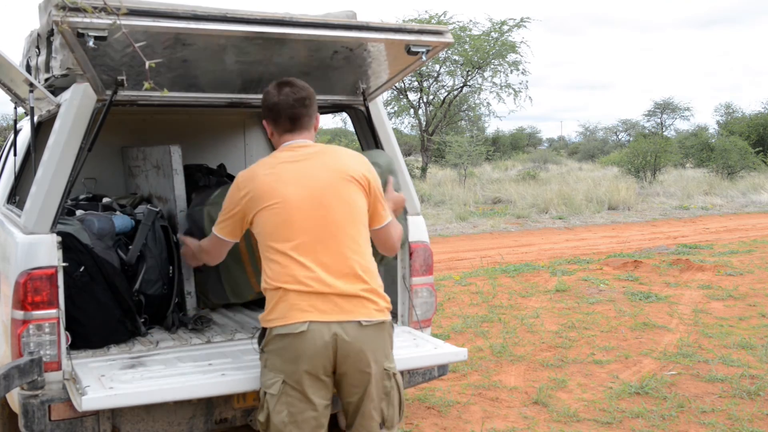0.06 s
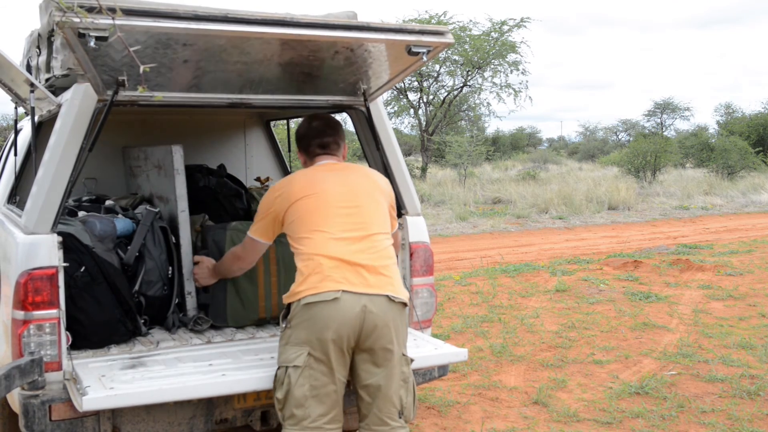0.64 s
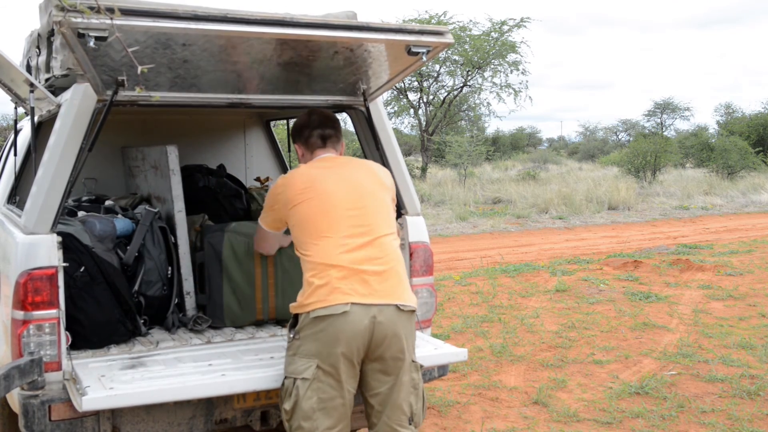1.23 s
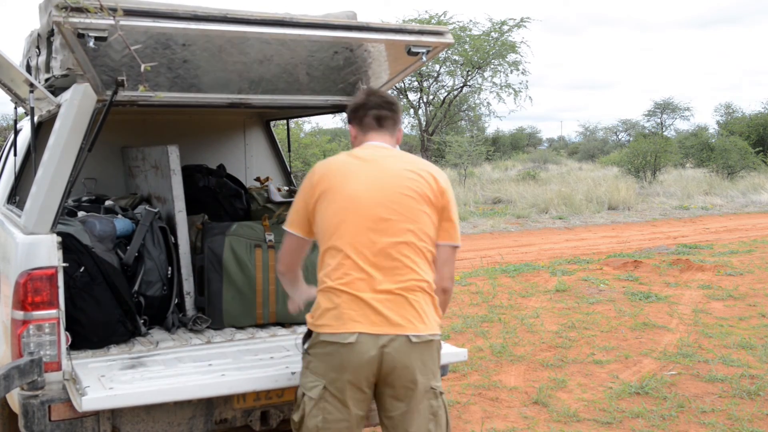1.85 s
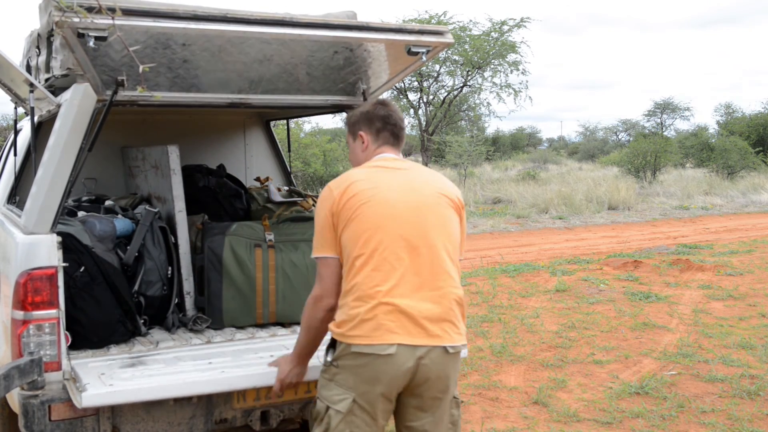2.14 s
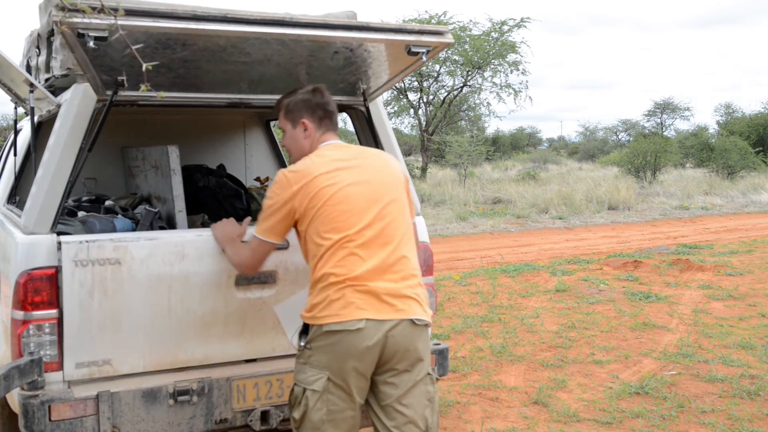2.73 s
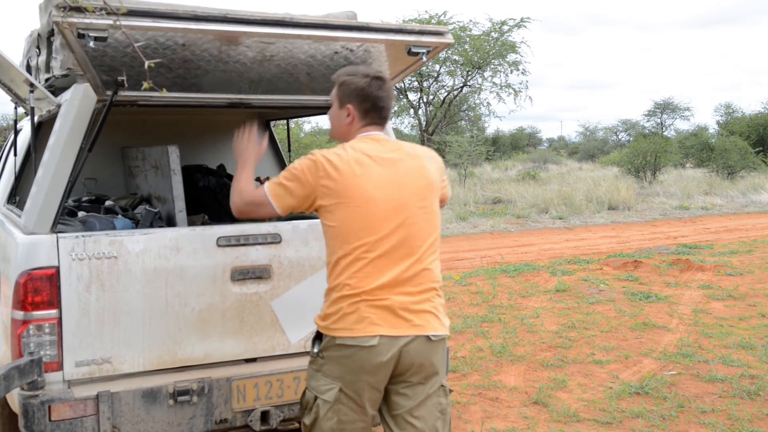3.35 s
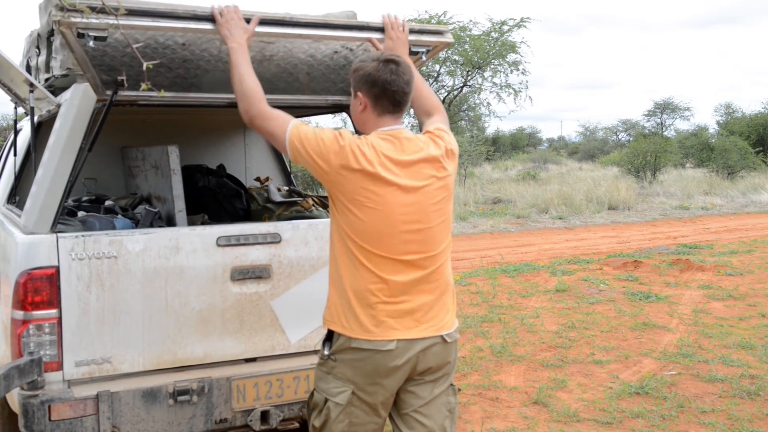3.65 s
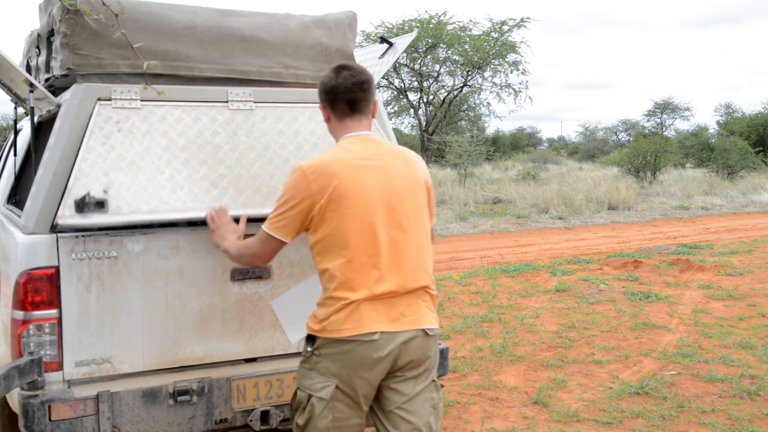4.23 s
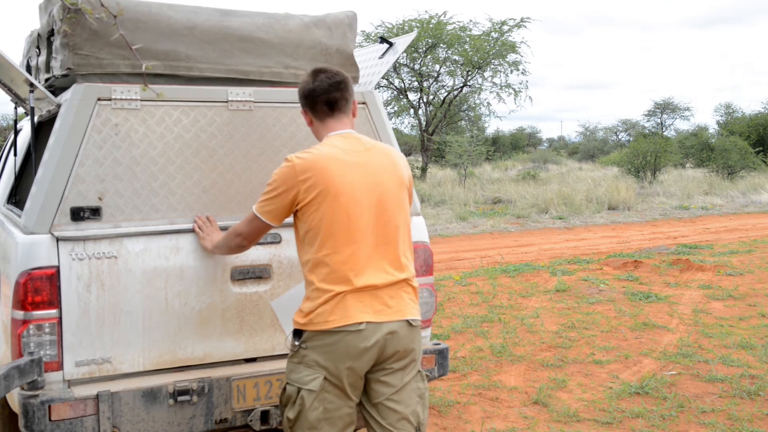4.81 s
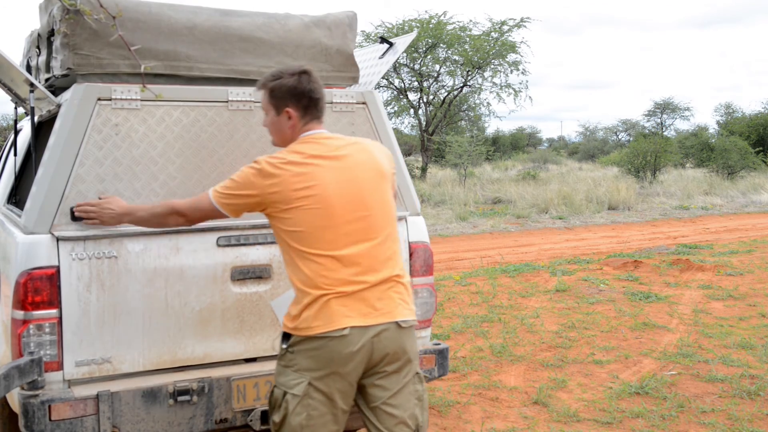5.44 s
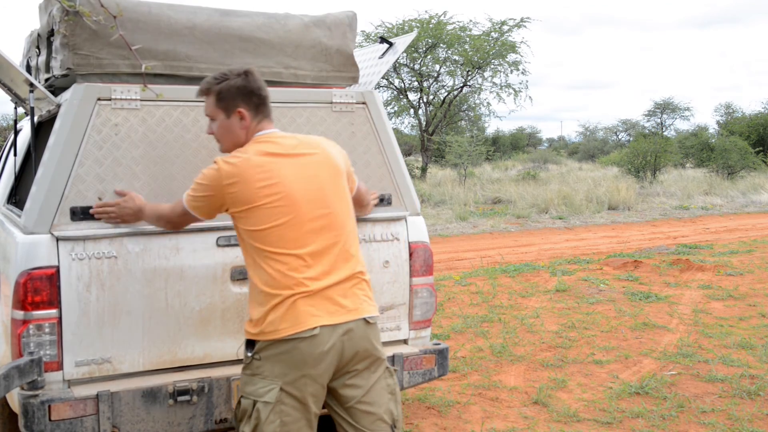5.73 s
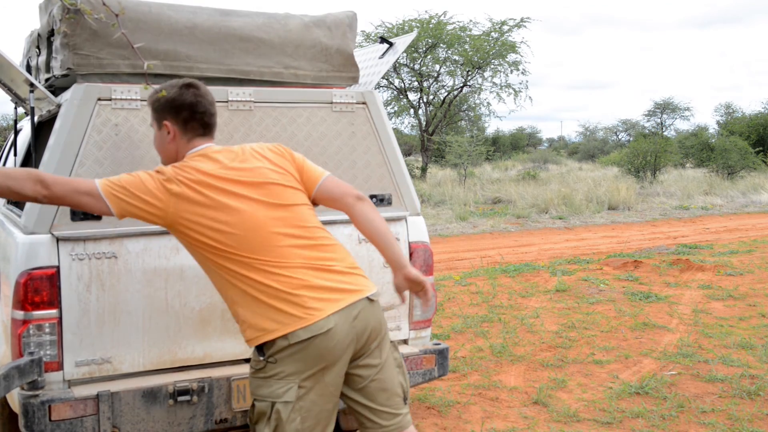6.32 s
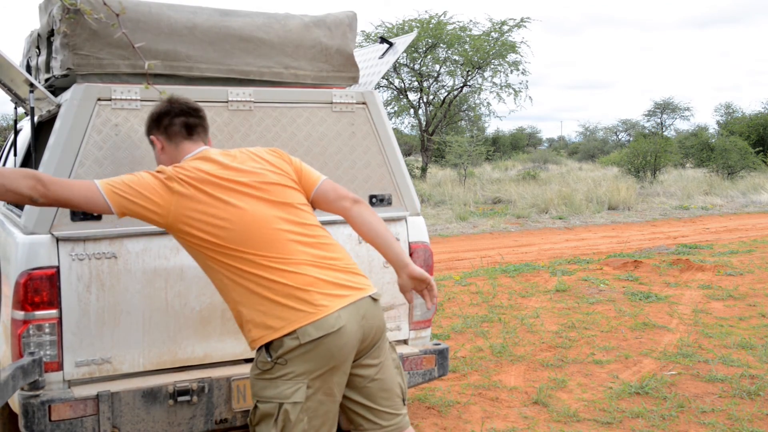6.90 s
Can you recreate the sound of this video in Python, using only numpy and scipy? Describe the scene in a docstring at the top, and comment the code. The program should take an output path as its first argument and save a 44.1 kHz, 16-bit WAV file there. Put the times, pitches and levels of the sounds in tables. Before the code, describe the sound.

Luggage is shoved into a truck outdoors, followed by a slammed steel tailgate and a hatch banged shut and pressed into its latches.

```python
"""Loading and closing a pickup

A canvas bag is shoved over the ribbed bed, thumping and scraping, its buckles tinkling. The steel
tailgate is lifted and slammed; the canopy hatch drops on hissing gas struts, bangs shut and is pressed
into its latches. Outdoors in still air: only the hollow truck rings on."""
import sys
import numpy as np
from scipy import signal
from scipy.fft import rfft, irfft, next_fast_len
from scipy.io import wavfile
from scipy.ndimage import uniform_filter1d

SR = 44100
rng = np.random.default_rng(int(sys.argv[2]) if len(sys.argv) > 2 else 0)


def unload_audio(sound):
    """Save the sound as a 16-bit wav file, at the path given as the first command line argument."""
    columns = np.transpose(np.atleast_2d(sound))
    # keep every value between -1 and 1, then stretch to whole-number steps
    steps = np.round(np.clip(columns, -1, 1) * 32767)
    wavfile.write(sys.argv[1], SR, steps.astype(np.int16))


N = 311654
T = np.arange(N) / SR
BANDS_HZ = 25 * 2 ** np.arange(0, 9.5, 1 / 3)
LN_1000 = np.log(1000)  # 60 dB of decay

# anchors of a contact spectrum: (body [Hz], clang [Hz], click [Hz], air [Hz])
CONTACT_HZ = (450, 1500, 5500, 12000)
# rumble of the hollow truck body: (frequency [Hz], level [dB])
RUMBLE_SPECTRUM = [(25, -9), (45, 2.5), (75, 1), (100, -4.5), (135, 2.5), (175, -9), (260, -24),
                   (600, -52.5)]


def undb(db):
    """Decibels to gain."""
    return 10 ** (np.asarray(db) / 20)


def unit(x):
    """Scale to rms 1."""
    return x / np.sqrt(np.mean(x ** 2))


def add(track, start_s, sound):
    """Mix a sound into a track."""
    i = max(int(start_s * SR), 0)
    track[i:i + len(sound)] += sound[:N - i]


def noise(spectrum):
    """Noise of rms 1 shaped by (frequency [Hz], level [dB]) points."""
    hz, db = np.transpose(spectrum)
    size = next_fast_len(N, True)
    bins_hz = np.fft.rfftfreq(size, 1 / SR) + 1
    gain = undb(np.interp(np.log(bins_hz), np.log(hz), db))
    return unit(irfft(rfft(rng.standard_normal(size)) * gain, size)[:N])


def waver(rate_hz):
    """Ramps between random levels, rms 1."""
    step = int(SR / rate_hz)
    held = np.repeat(rng.standard_normal(N // step + 1), step)
    return unit(uniform_filter1d(held, step)[:N])


def push(t, length_s, attack_s, release_s):
    """Envelope of an effort: attack, hold, release."""
    return (1 - np.exp(-np.maximum(t, 0) / attack_s)) * np.exp(-np.maximum(t - length_s, 0) / release_s)


def split(x):
    """Third-octave bands at equal rms."""
    size = next_fast_len(N)
    spectrum = rfft(x, size)
    octave = np.log2(np.fft.rfftfreq(size, 1 / SR) + 1)
    shares = (np.sqrt(np.maximum(1 - 3 * abs(octave - np.log2(hz)), 0)) for hz in BANDS_HZ)
    return np.array([unit(irfft(spectrum * share, size)[:N]) for share in shares]) / np.sqrt(5)


def contact_gains(levels_db, bass_cut_db=7):
    """Band gains from levels at CONTACT_HZ, sloped below the lowest anchor."""
    octaves_below = np.maximum(np.log2(CONTACT_HZ[0] / BANDS_HZ), 0)
    band_db = np.interp(np.log(BANDS_HZ), np.log(CONTACT_HZ), levels_db)
    return undb(band_db - bass_cut_db * octaves_below ** 0.91)


def bandpass(x, hz, width_hz):
    """One resonance, unity gain at its peak."""
    return signal.lfilter(*signal.iirpeak(hz, hz / width_hz, fs=SR), x)


def resonate(x, peaks):
    """Add broad resonances."""
    return x + sum(undb(db) * bandpass(x, hz, width_hz) for hz, width_hz, db in peaks)


def ring(modes, scatter_db=2.0, detune=0.003):
    """Decaying modes; strike point and strain vary per blow."""
    t = T[:SR]
    hz, db, t60_s = np.transpose(modes)[:, :, None]
    side, size, strain = rng.standard_normal((len(modes), 3)).T[:, :, None]
    fade = undb(db + scatter_db * size) * np.exp(-LN_1000 * t / t60_s)
    return np.sum(np.sign(side) * fade * np.sin(2 * np.pi * hz * (1 + detune * strain) * t), 0)


def knocks(bands, hits, modes, ring_db, air_db, tail_db, tail_t60_s, damping, build_cycles, bass_cut_db):
    """Each contact excites dense panel modes, a few clear ones and the hollow behind them."""
    out, t, hz = np.zeros(N), T[:SR // 2], BANDS_HZ[:, None]
    build = 1 - np.exp(-t * hz / build_cycles)  # low modes start slower
    loss = LN_1000 * t * (hz / 2000) ** damping  # high modes die sooner; t60 holds at 2 kHz
    tail_gains = undb(tail_db) * np.minimum(1000 / hz, 1) ** 0.57
    tail = tail_gains * np.exp(-loss / tail_t60_s) * (1 - np.exp(-t / 0.12))
    for start_s, body_db, clang_db, click_db, t60_s in hits:
        i = rng.integers(N - len(t))
        gains = contact_gains((body_db, clang_db, click_db, click_db + air_db), bass_cut_db)
        envelope = build * np.exp(-loss / t60_s) + tail
        add(out, start_s, gains @ (bands[:, i:i + len(t)] * envelope))
        damped = np.exp(-LN_1000 * T[:SR] / (8 * t60_s))  # a hand deadens knock and ring alike
        add(out, start_s, undb(clang_db + ring_db) * ring(modes) * damped)
    return out


def tinkles(taps, modes, tick_db, tick_s):
    """Small metal parts tick and ring briefly."""
    out = np.zeros(N)
    highpass = signal.butter(2, 4000, "high", fs=SR, output="sos")
    for start_s, db in taps:
        tick = signal.sosfilt(highpass, rng.standard_normal(SR)) * np.exp(-T[:SR] / tick_s)
        add(out, start_s, undb(db) * (0.5 * ring(modes) + undb(tick_db) * tick))
    return out


def threads(grain_db=2.0, grain_samples=16):
    """Threads catch and release in dense tiny clicks; returned as bands."""
    sizes = np.minimum(rng.exponential(size=N // grain_samples + 1), 4)
    return split(rng.standard_normal(N) * undb(grain_db * np.repeat(sizes, grain_samples)[:N]))


def rubs(grains, swells, body_db, air_db, lateness):
    """Swells of light friction; lateness over 1 builds slowly and stops fast."""
    out = np.zeros(N)
    for start_s, length_s, rasp_db, hiss_db in swells:
        i, size = int(start_s * SR), int(length_s * SR)
        swell = np.sin(np.pi * np.linspace(0, 1, size) ** lateness).clip(0)
        gains = contact_gains((rasp_db + body_db, rasp_db, hiss_db, hiss_db + air_db))
        add(out, start_s, gains @ grains[:, i:i + size] * swell)
    return out


def open_air(level_db=-58):
    """Quiet, steady outdoor noise."""
    # (frequency [Hz], level [dB])
    spectrum = [(15, -28), (25, -0.5), (86, 3.5), (123, -2.5), (165, -5.5), (350, -18), (830, -17),
                (1720, -23), (2570, -23), (3280, -26.5), (6970, -31), (14400, -35.5), (15600, -41)]
    return undb(level_db) * noise(spectrum)


def rocking(attack_s=0.0067, release_s=0.15):
    """The body rumbles on its springs while someone leans on it."""
    # weight on the truck: (start [s], length [s], level [dB])
    leans = [(0, 1, -33), (1.494, 0.21, -40.5), (2.02, 0.72, -42.5), (3.596, 0.14, -47), (4.894, 0.14, -42)]
    load = sum(undb(db) * push(T - start_s, length_s, attack_s, release_s)
               for start_s, length_s, db in leans)
    return noise(RUMBLE_SPECTRUM) * load


def handling(grains):
    """Light rubbing as someone works at the truck."""
    # hands and arms over the canvas: (start [s], length [s], rasp [dB], hiss [dB])
    strokes = [(0.866, 0.12, -61.5, -47.5), (1.024, 0.38, -68, -60), (1.284, .17, -59, -55.5),
               (1.48, 0.36, -57, -47)]
    # hands, clothes and soles: (start [s], length [s], rasp [dB], hiss [dB])
    brushes = [(2.042, 0.29, -59.5, -70), (2.636, 0.18, -72.5, -66.5), (3.129, 0.17, -62.5, -67),
               (3.75, 0.096, -64.5, -73), (3.975, 0.34, -64, -88), (4.873, 0.04, -39.5, -59),
               (5.13, 0.25, -75, -74), (5.53, 0.23, -68, -68), (6.21, .16, -72, -66),
               (6.469, 0.14, -66.5, -70)]
    return (rubs(grains, strokes, body_db=-7.5, air_db=-3.5, lateness=2.03)
            + rubs(grains, brushes, body_db=1.0, air_db=-2, lateness=0.96))


def struts(top_hz=15400, end_hz=3300, end_s=4.372, flutter_hz=600):
    """Gas hisses past the pistons; a scratchy whistle in each strut falls ever faster until the stop."""
    # hiss envelope: (time [s], level [dB])
    flow = [(3.82, -66), (3.93, -58), (4.0, -62), (4.05, -58), (4.23, -66.5), (4.3, -60), (4.384, -56.5)]
    # gas hiss: (frequency [Hz], level [dB])
    spectrum = [(1180, -27), (2000, -11), (3020, -2.5), (4230, -7.5), (5970, -3), (6970, 2), (9580, -11.5),
                (15600, -18.5)]
    # one whistle per strut: (start [s], level [dB])
    whistles = [(4.243, -54.5), (4.293, -56)]
    flow_db = np.interp(T, *np.transpose(flow), left=-120, right=-120)
    out = noise(spectrum) * undb(flow_db + 1.85 * waver(rate_hz=54))
    lowpass = signal.butter(2, flutter_hz, fs=SR, output="sos")
    for start_s, db in whistles:
        stroke = np.linspace(0, 1, int((end_s - start_s) * SR))
        hz = top_hz + (end_hz - top_hz) * stroke ** 1.4
        flutter = unit(signal.sosfilt(lowpass, rng.standard_normal(N)))
        scratch = undb(3 * waver(rate_hz=120))
        envelope = (flutter * scratch)[:len(hz)] * signal.windows.tukey(len(hz), 0.15)
        add(out, start_s, undb(db) * envelope * np.sin(2 * np.pi * np.cumsum(hz) / SR))
    return out


def buckles():
    """The bag's buckles tap and ring."""
    # buckle contacts: (time [s], level [dB])
    taps = [(.054, -44), (.064, -42.5), (.291, -29), (.47, -34), (.788, -44.5), (1.299, -26.5),
            (1.434, -36)]
    # buckle modes: (frequency [Hz], level [dB], t60 [s])
    modes = [(7214, -8, .07), (9205, -11, .06), (10220, -3, .065), (11050, -11, .08), (13830, 0, .075),
             (14990, -11, .08)]
    return tinkles(taps, modes, tick_db=-7, tick_s=0.0096)


def bag_scrape(grains, attack_s=0.012, release_s=0.041, sag_db_per_s=59.5, catch_db=1.6):
    """Canvas catches and slips over the ribbed bed; each shove loses speed to friction."""
    # slides of the bag: (start [s], length [s], rasp [dB], hiss [dB], air [dB])
    shoves = [(0.134, 0.038, -31.5, -38, -51), (0.179, 0.021, -28.5, -24, -29),
              (.222, 0.026, -30.5, -28, -33), (0.341, 0.02, -29.5, -34, -35),
              (0.368, 0.0083, -51, -27.5, -38), (0.421, 0.092, -43, -39, -43.5),
              (0.524, 0.13, -43.5, -39.5, -43.5), (0.607, 0.017, -55.5, -41, -39.5),
              (0.669, .08, -54.5, -46, -48), (0.737, 0.016, -43, -47.5, -58), (0.811, 0.037, -51, -48, -64),
              (0.93, 0.26, -55, -71, -86)]
    # broad bed resonances: (frequency [Hz], width [Hz], level [dB])
    bed_peaks = [(753, 47, 1), (970, 53, -1), (1223, 90, 0), (1340, 140, -6.5), (1570, 65, -7),
                 (1920, 74, -16), (2480, 260, -33)]
    out, t = np.zeros(N), T[:SR // 2]
    steepness = (BANDS_HZ[:, None] / CONTACT_HZ[1]) ** 0.31  # treble depends most on speed
    for start_s, length_s, rasp_db, hiss_db, air_db in shoves:
        i = int(start_s * SR)
        speed = push(t, length_s, attack_s, release_s) * undb(-sag_db_per_s * t)
        gains = contact_gains((rasp_db - 4, rasp_db, hiss_db, air_db))
        add(out, start_s, gains @ (grains[:, i:i + len(t)] * speed ** steepness))
    return resonate(out * undb(catch_db * waver(rate_hz=170)), bed_peaks)


def bag_bumps(bands):
    """The bag bumps the bed and other luggage."""
    # bag contacts: (time [s], body [dB], clang [dB], click [dB], t60 [s])
    hits = [(0.055, -20, -55.5, -60, .04), (0.103, -18.5, -54, -66, 0.033), (0.529, -21.5, -45, -72, 0.043),
            (.548, -22, -40.5, -66, 0.1), (1.015, -67, -74, -64, .06), (1.071, -68, -65, -60, 0.06),
            (1.131, -63, -65, -57.5, 0.18), (1.261, -39, -28.5, -26.5, 0.081), (1.579, -49, -65, -72, 0.18)]
    # bed floor modes: (frequency [Hz], level [dB], t60 [s])
    modes = [(421, 10, 0.066), (774, -5, 0.097), (941, 2, 0.1), (1278, 2, 0.076), (2803, 3.5, 0.086)]
    return knocks(bands, hits, modes, ring_db=-1, air_db=-6, tail_db=-54, tail_t60_s=0.4,
                  damping=0.29, build_cycles=0.71, bass_cut_db=1.0)


def thumps(body_db=-18, body_t60_s=1.15, overtone_db=-6, overtone_ratio=1.85):
    """Soft blows drive a panel for a few cycles and leave the hollow body rumbling."""
    # blows to bed and body: (time [s], level [dB], pitch [Hz], swell [s])
    blows = [(.043, -13, 76.7, 0.02), (.051, -13, 166, 0.0086), (.096, -9.5, 109.8, 0.0077),
             (.267, -18, 109, 0.0064), (.483, -19, 79, 0.0086), (0.529, -17, 178, 0.025),
             (0.744, -13.5, 120, 0.0095), (.792, -18, 143.6, 0.02), (0.826, -17, 90, 0.015),
             (.921, -21.5, 126, 0.0037), (1.019, -25.5, 88.4, 0.032), (1.193, -26.5, 138, 0.011),
             (1.256, -16.5, 79.6, 0.0048), (1.534, -24.5, 86.4, 0.028), (1.577, -21, 114.6, 0.011),
             (1.746, -18, 96.7, 0.0094), (2.18, -26, 126, .011), (2.89, -18.5, 86, 0.013),
             (2.904, -7, 126.7, 0.0091), (3.62, -39, 106.4, 0.023), (3.685, -36.5, 150, 0.016),
             (3.777, -35.5, 107, .013), (4.016, -41.5, 101, 0.026), (4.388, -9, 141.5, 0.024),
             (4.397, -10.5, 73.7, 0.021), (4.398, -21, 34.2, 0.024), (4.89, -30, 106, 0.02),
             (4.925, -22, 48.3, 0.028), (5.615, -38, 100, 0.012), (6.655, -32, 112, 0.016),
             (6.699, -26.5, 110, 0.015), (7.003, -30, 80, 0.012)]
    out, t, rumble = np.zeros(N), T[:SR], noise(RUMBLE_SPECTRUM)
    for start_s, db, hz, swell_s in blows:
        force = (t / swell_s * np.exp(1 - t / swell_s)) ** 1.8
        phase = 2 * np.pi * hz * t
        # overtone and rumble gain on the fundamental in hard blows
        overtone = undb(overtone_db + db / 2) * force ** 2 * np.sin(overtone_ratio * phase)
        i = rng.integers(N - len(t))
        envelope = np.exp(-LN_1000 * t / body_t60_s) * (1 - np.exp(-t / swell_s))
        hollow = undb(body_db + db / 4) * rumble[i:i + len(t)] * envelope
        add(out, start_s, undb(db) * (force * np.sin(phase) + overtone + hollow))
    return out


def hatch_catches():
    """The hatch's catches click and ring."""
    # catch contacts: (time [s], level [dB])
    taps = [(3.686, -40), (3.71, -39), (3.737, -40.5), (3.794, -48), (3.841, -47.5), (4.404, -30),
            (4.445, -32), (4.478, -30), (4.493, -31), (4.987, -53), (4.999, -50)]
    # catch modes: (frequency [Hz], level [dB], t60 [s])
    modes = [(6250, -3, .05), (6780, -5, .028), (7300, 1, .038), (7700, -2, .02), (8150, -3, .02),
             (8800, -9, .018)]
    return tinkles(taps, modes, tick_db=-14, tick_s=0.0032)


def hatch(bands):
    """The canopy hatch is grabbed, banged shut and pressed home."""
    # hatch contacts: (time [s], body [dB], clang [dB], click [dB], t60 [s])
    hits = [(3.65, -56.5, -50.5, -56, 0.14), (3.686, -43.5, -54.5, -47.5, 0.12),
            (3.74, -47, -59, -56, 0.15), (3.979, -65.5, -71, -43, .07), (4.033, -58.5, -59.5, -53, 0.16),
            (4.321, -60, -51, -48, .03), (4.383, -28, -17, -22, 0.039), (4.398, -30.5, -31.5, -33, 0.38),
            (4.445, -28.5, -34.5, -44, 0.18), (4.477, -39, -39, -36.5, 0.12),
            (4.804, -48.5, -48.5, -71, 0.11), (4.885, -28, -36, -26.5, .071),
            (4.911, -32, -30.5, -25.5, 0.071), (4.946, -37.5, -42.5, -45, 0.089),
            (5.534, -49.5, -68, -64, 0.42), (5.618, -26, -32, -28.5, 0.066), (5.649, -33, -49.5, -64, 0.16),
            (6.402, -87, -58, -49, 0.076), (6.663, -48, -44, -69, .05), (6.687, -46, -43.5, -38, 0.02)]
    # hatch modes: (frequency [Hz], level [dB], t60 [s])
    modes = [(287, -1, 0.37), (442, -4, 0.53), (773, -1.5, 0.33), (955, 2, 0.46), (1089, 4, 0.32),
             (1316, 1, 0.25), (1590, -12, 0.33), (1944, -9, 0.26), (2950, -10, 0.3), (3050, -7, 0.16),
             (3871, -17, 0.34)]
    return knocks(bands, hits, modes, ring_db=-11, air_db=-6.5, tail_db=-15, tail_t60_s=0.34,
                  damping=0.15, build_cycles=0.94, bass_cut_db=-0.8)


def tailgate_latch(scrape_at_s=2.02, scrape_db=-29):
    """The rods scrape once as they unload; the springs ring at each bite."""
    # rod scrape: (frequency [Hz], level [dB])
    spectrum = [(3000, -18), (6500, 1), (9000, -10), (12000, -2.5), (15500, -16)]
    # latch bites: (time [s], level [dB])
    taps = [(2.022, -32.5), (2.488, -41), (2.864, -26), (3.228, -47.5)]
    # latch modes: (frequency [Hz], level [dB], t60 [s])
    modes = [(1085, 0, .3), (1290, 2, .2), (1430, -1, .14), (1660, -7, .1), (2380, -3, .07),
             (6300, -2, .04), (6800, -1, .04), (7400, 0, .04), (9400, -17, .2)]
    envelope = push(T - scrape_at_s, length_s=0.004, attack_s=0.00067, release_s=0.011)
    scrape = undb(scrape_db) * noise(spectrum) * envelope
    return scrape + tinkles(taps, modes, tick_db=-13, tick_s=0.003)


def tailgate(bands):
    """The hollow steel tailgate is gripped, lifted, slammed and leant on."""
    # tailgate contacts: (time [s], body [dB], clang [dB], click [dB], t60 [s])
    hits = [(2.021, -44.5, -38, -47, 0.2), (2.487, -37, -34.5, -39, 0.098), (2.569, -48.5, -54, -48, 0.13),
            (2.59, -48, -44.5, -56, 0.15), (2.863, -43.5, -28, -22, 0.29), (2.881, -23.5, -12, -9, 0.088),
            (2.892, -15.5, -12, -13.5, 0.13), (3.227, -55, -42.5, -42, 0.11)]
    # tailgate modes: (frequency [Hz], level [dB], t60 [s])
    modes = [(371, -15, .35), (425, 2, .2), (522, 1, .2), (660, 0, .17), (760, 8, .19), (818, 2, .17),
             (990, -7, .16), (1088, -6, .42), (1190, -7, .17), (1480, -4, .2), (1722, -1, .17),
             (3040, -1, .1), (3405, 4, .12), (5149, 0, .1), (5741, 2, .1)]
    # broad shell resonances: (frequency [Hz], width [Hz], level [dB])
    shell_peaks = [(186, 150, -1), (1110, 170, 1), (1480, 396, -7), (6654, 590, -6)]
    steel = knocks(bands, hits, modes, ring_db=-13.5, air_db=-3.5, tail_db=-14.5, tail_t60_s=0.35,
                   damping=0.23, build_cycles=7.2, bass_cut_db=-1.0)
    return resonate(steel, shell_peaks)


def scene():
    """Bag, tailgate and hatch over the rocking body and open air; mono."""
    bands, grains = split(rng.standard_normal(N)), threads()
    panels = bag_bumps(bands) + undb(-1.5) * tailgate(bands) + undb(-1) * hatch(bands)
    hardware = tailgate_latch() + buckles() + hatch_catches()
    friction = bag_scrape(grains) + handling(grains)
    return (panels + hardware + friction + thumps() + struts() + rocking() + open_air())[None]


def record(dry, low_cut_hz=24, top_hz=15750):
    """Microphone: low cut, presence peak between dips, clip at full scale, steep lowpass."""
    # microphone response: (frequency [Hz], width [Hz], gain [dB])
    bells = [(4300, 700, -1.5), (7000, 2500, 5.5), (9170, 1100, -3.5), (15525, 1500, -4)]
    x = signal.sosfilt(signal.butter(2, low_cut_hz, "high", fs=SR, output="sos"), dry)
    for hz, width_hz, db in bells:
        x = x + (undb(db) - 1) * bandpass(x, hz, width_hz)
    lowpass = signal.ellip(10, 0.2, 70, top_hz, fs=SR, output="sos")
    return signal.sosfilt(lowpass, np.clip(x, -1, 1))


dry = scene()
out = record(dry)
unload_audio(out)
```